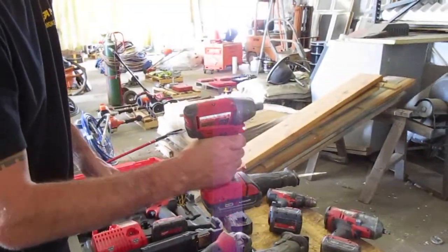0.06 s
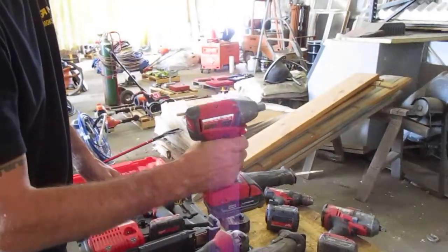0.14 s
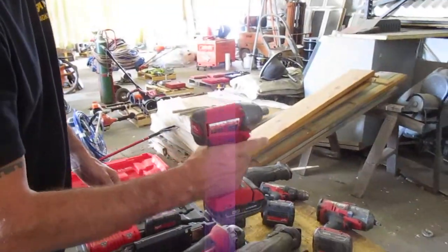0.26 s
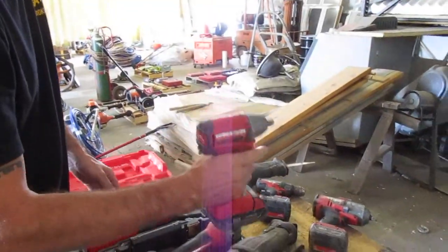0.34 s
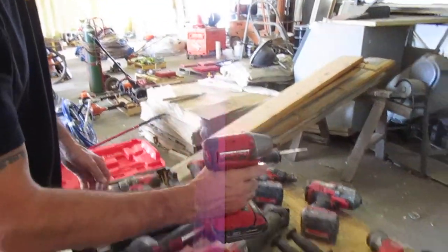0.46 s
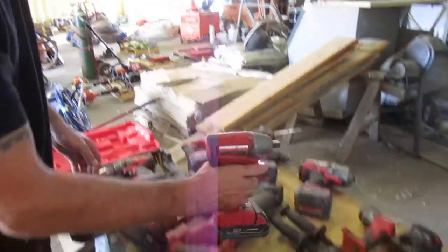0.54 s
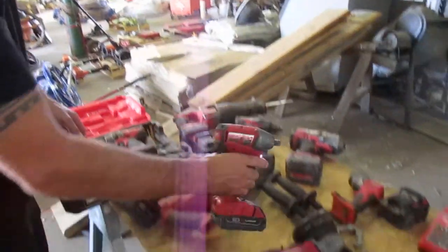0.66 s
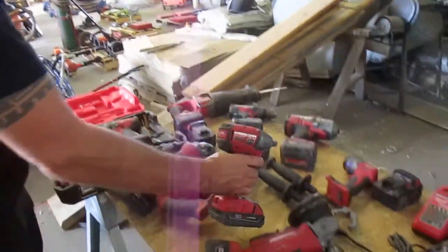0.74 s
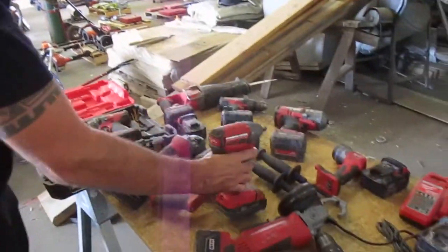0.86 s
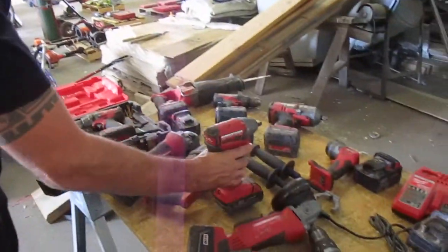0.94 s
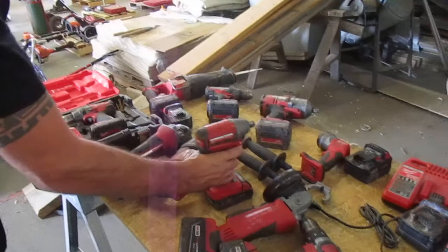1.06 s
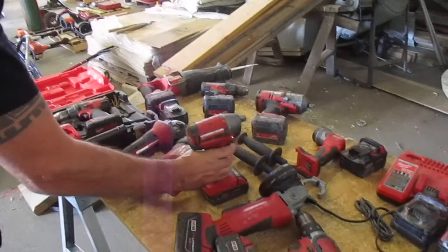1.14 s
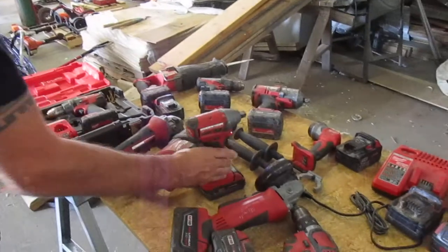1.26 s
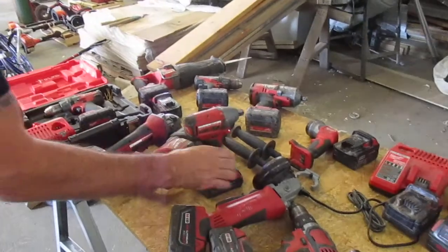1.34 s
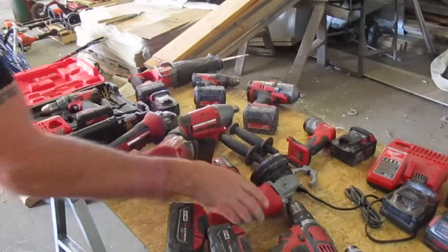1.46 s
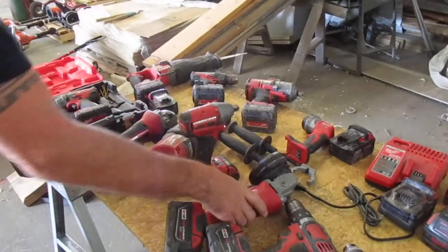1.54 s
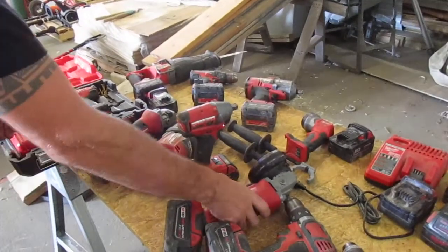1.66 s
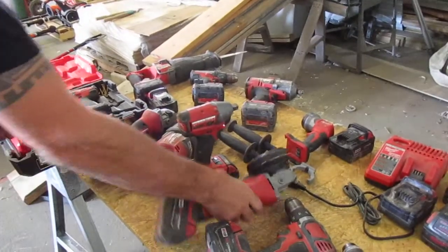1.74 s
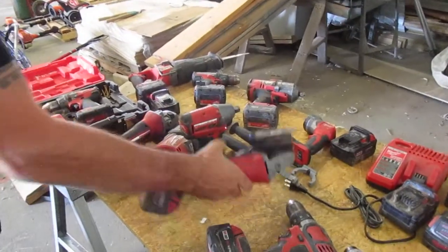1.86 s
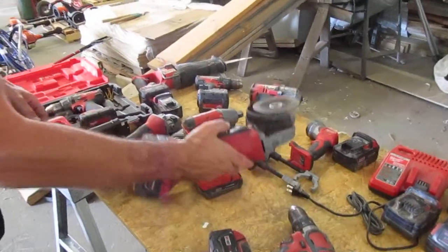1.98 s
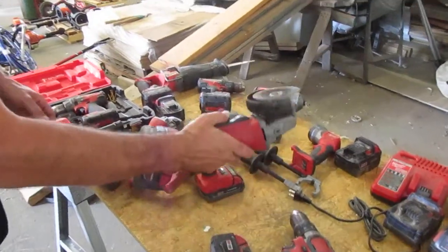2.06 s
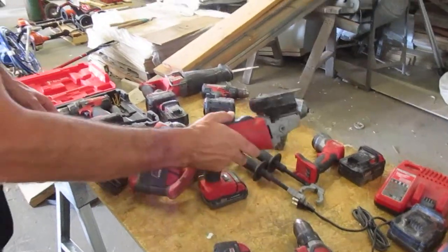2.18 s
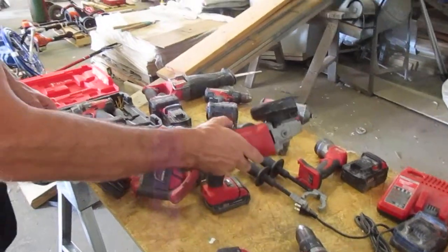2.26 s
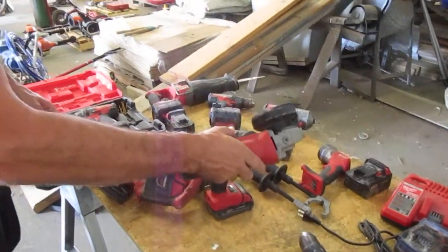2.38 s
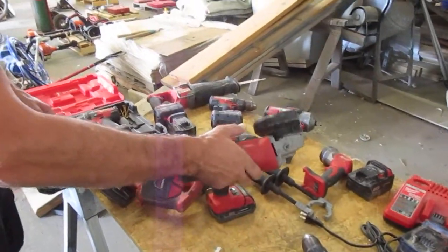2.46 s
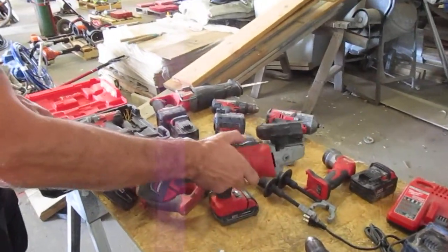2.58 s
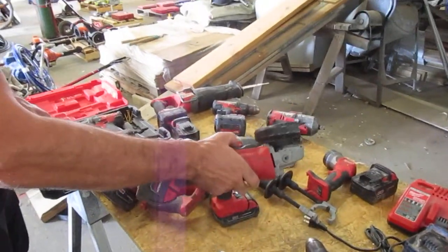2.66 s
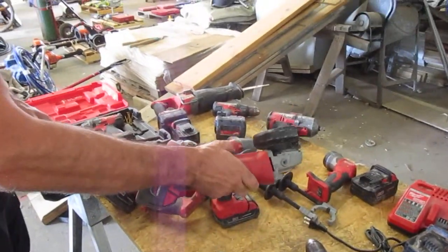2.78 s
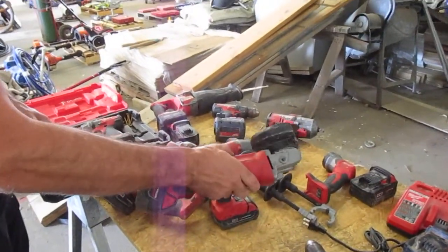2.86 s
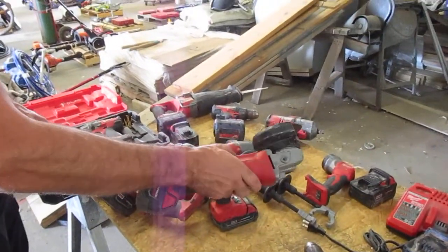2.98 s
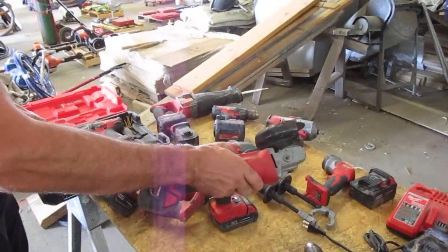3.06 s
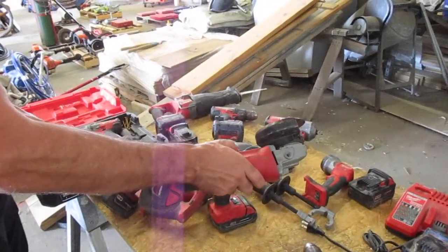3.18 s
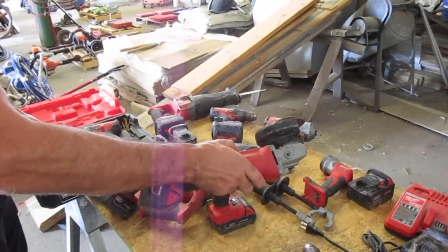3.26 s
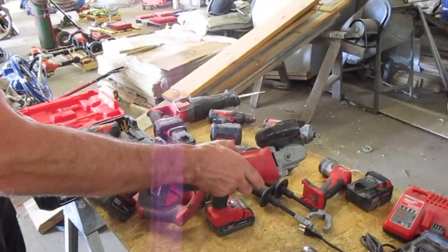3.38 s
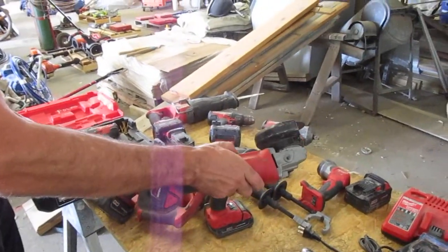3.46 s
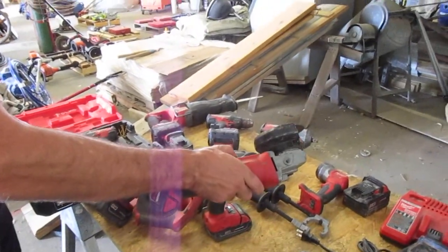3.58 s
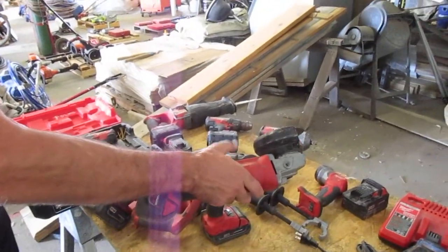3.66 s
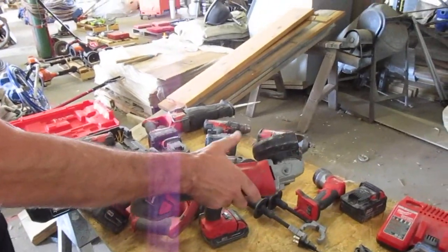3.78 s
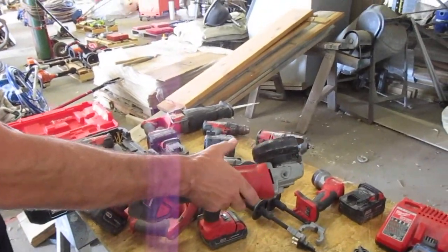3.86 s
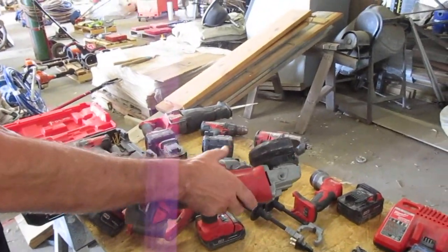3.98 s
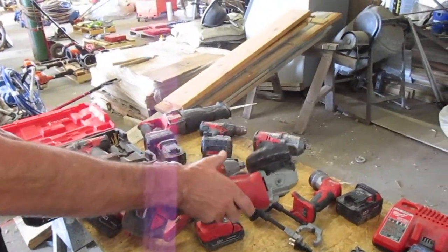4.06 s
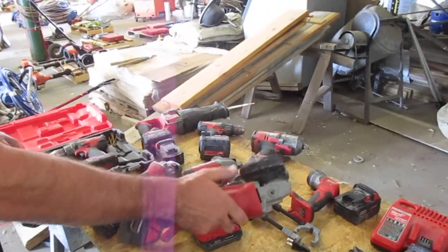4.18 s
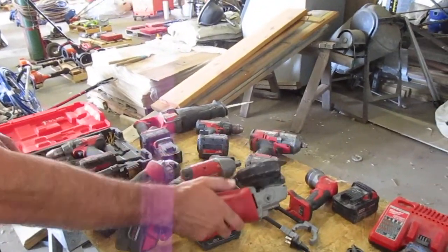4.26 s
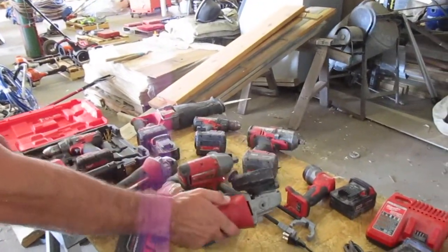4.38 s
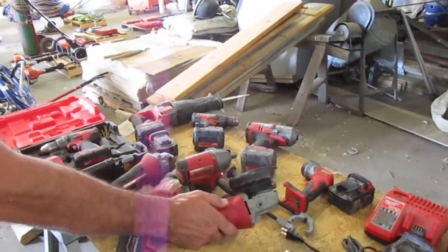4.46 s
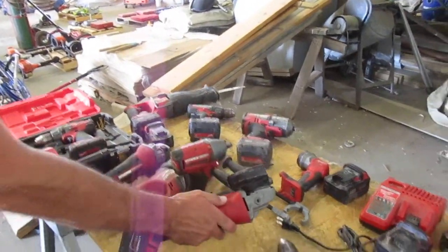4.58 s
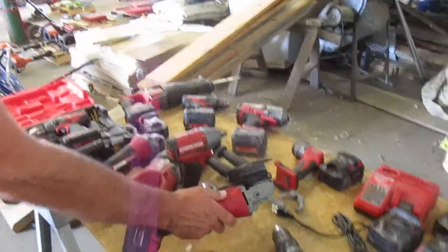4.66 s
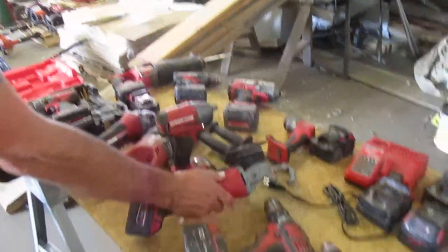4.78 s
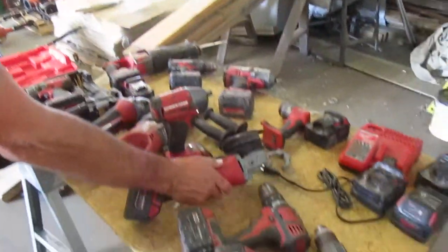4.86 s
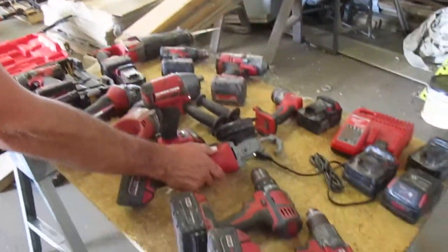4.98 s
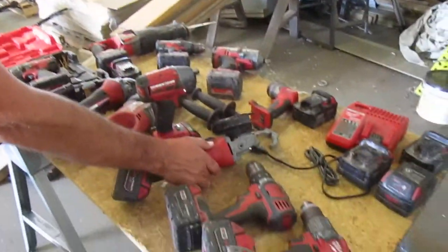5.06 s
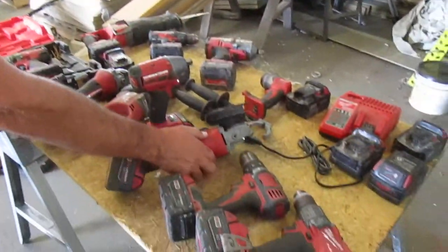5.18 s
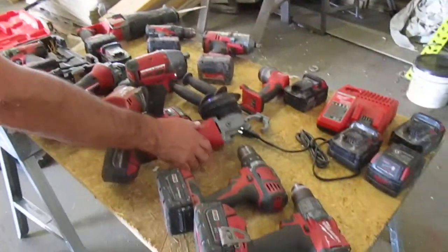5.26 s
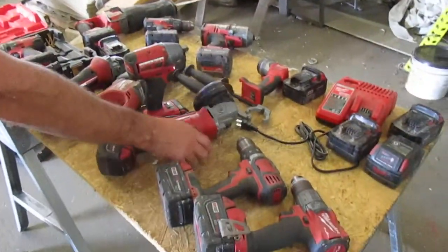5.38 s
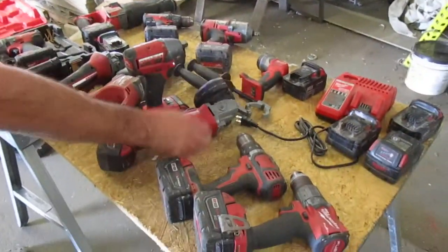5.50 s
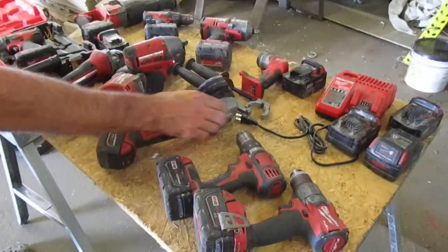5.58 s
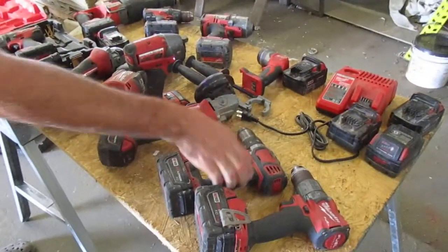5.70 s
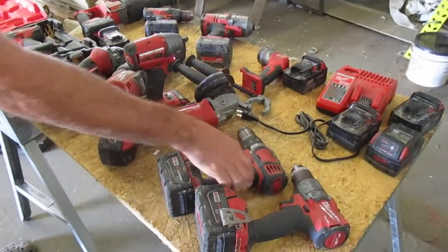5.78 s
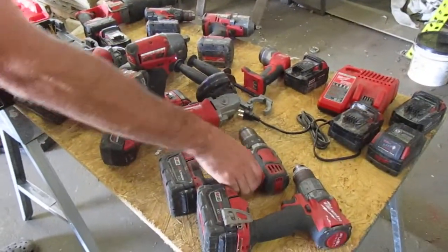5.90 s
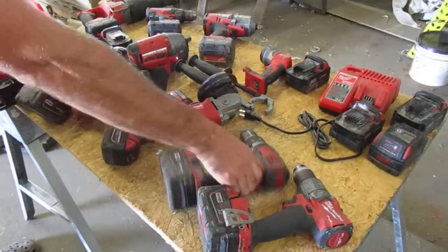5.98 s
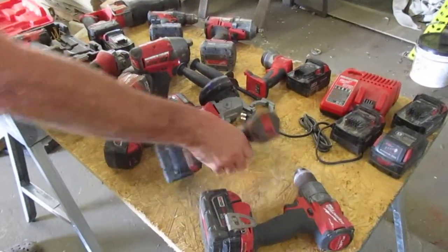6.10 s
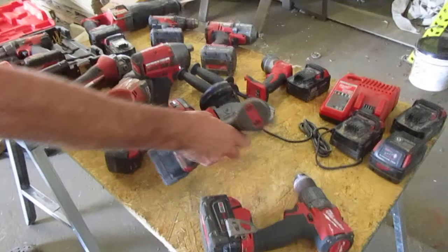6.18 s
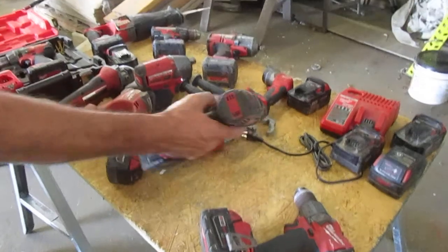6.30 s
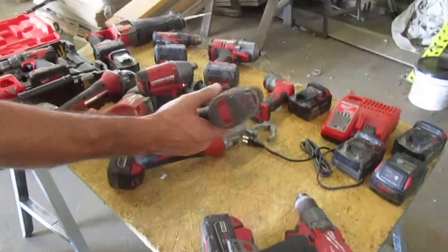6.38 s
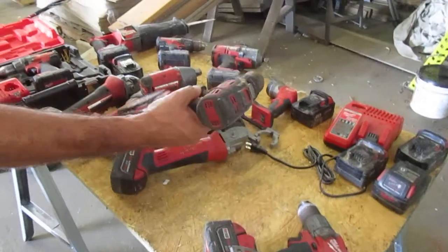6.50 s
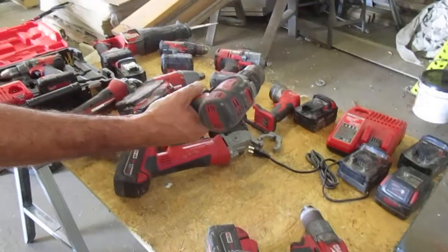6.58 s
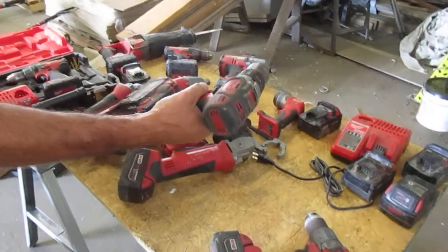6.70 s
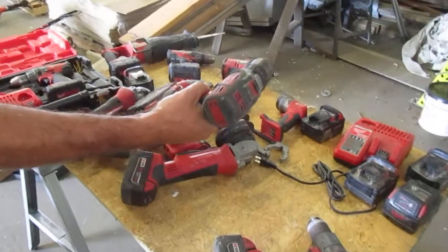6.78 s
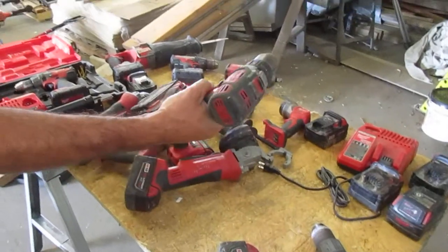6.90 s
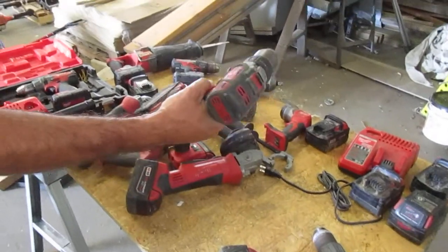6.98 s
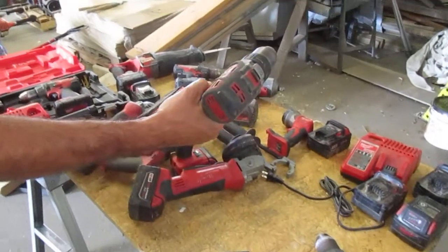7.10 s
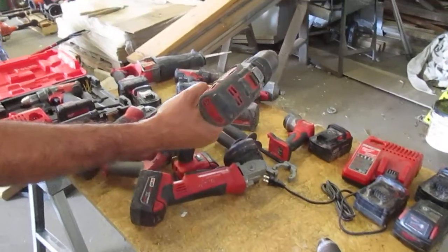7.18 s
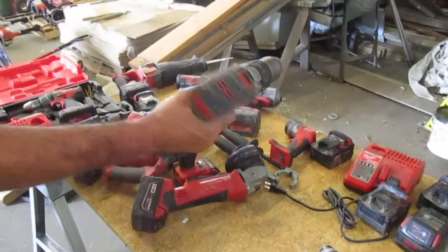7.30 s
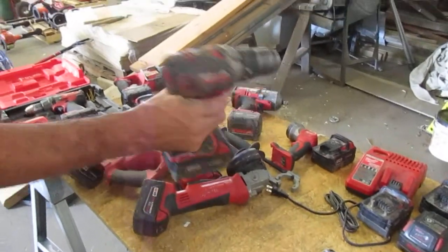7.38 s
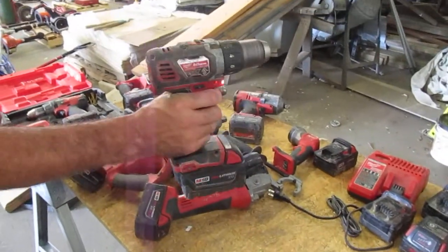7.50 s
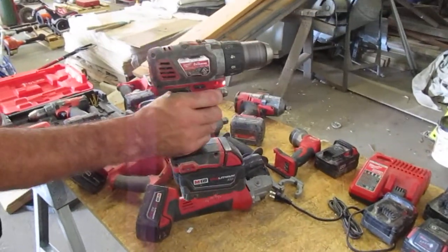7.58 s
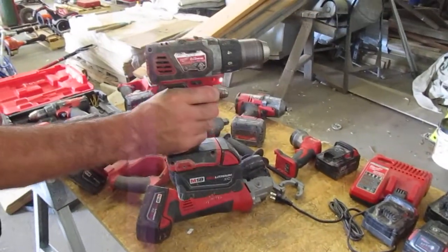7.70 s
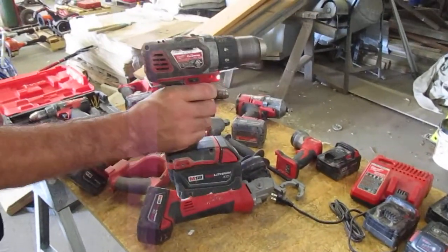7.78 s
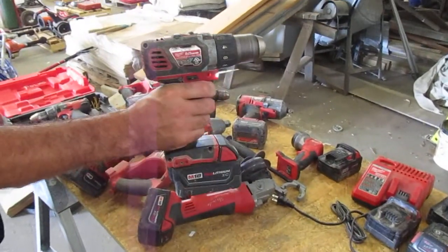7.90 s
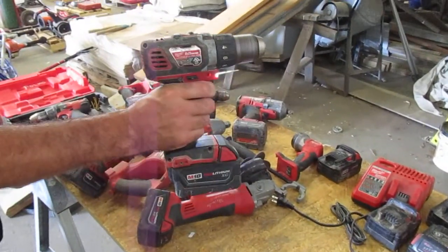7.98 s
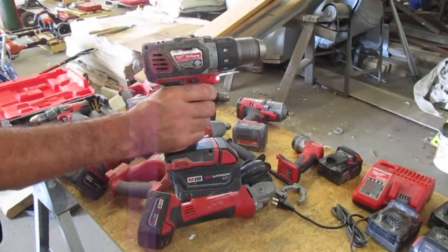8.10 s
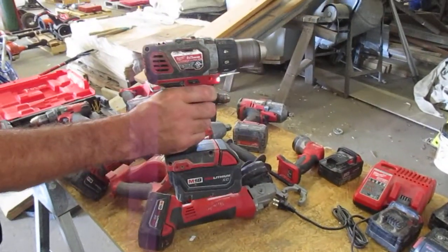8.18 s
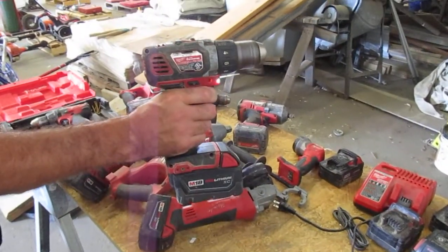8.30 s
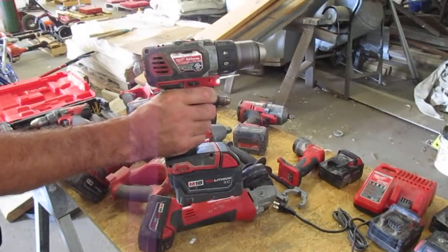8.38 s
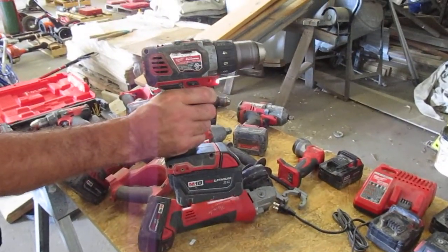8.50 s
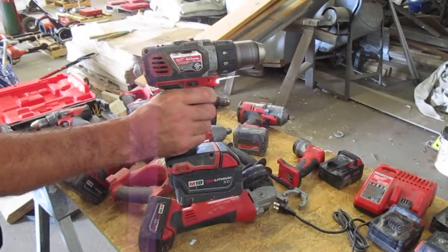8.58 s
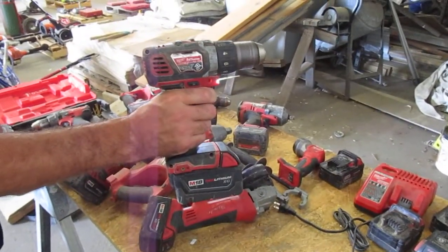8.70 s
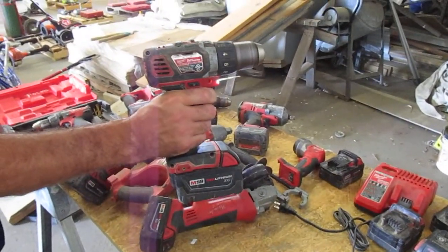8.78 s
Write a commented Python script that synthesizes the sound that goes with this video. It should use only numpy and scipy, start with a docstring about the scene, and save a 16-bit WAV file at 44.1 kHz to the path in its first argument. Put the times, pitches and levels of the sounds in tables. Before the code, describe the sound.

Close in a large, lightly echoing workshop, an impact driver's whine drops quickly to a stop. It lands with a hard thump on plywood, and small plastic clicks follow. A sharp switch snap starts an angle grinder, screaming briefly, then coasting down with rattling gear knocks. It is set down with a thud, lighter bumps follow, and a drill runs up and holds a bright whine. Faint low rumble stays behind; centred single microphone.

```python
"""First an impact driver brakes to a stop on a plywood bench in a large workshop; thumps and clicks follow.
An angle grinder runs up, then coasts with its gears rattling, and last a drill runs up to full speed.
Motors are tones on a speed curve over shaped noise; blows ring the board, plastic or casing as decaying sines.
Behind are a low rumble, hiss and far engine swells, with a hall tail on tools and blows.
One microphone feeds both channels, and its converter clips at full scale."""
import sys
import numpy as np
from scipy import signal
from scipy.fft import rfft, irfft
from scipy.io import wavfile
from scipy.ndimage import uniform_filter1d, map_coordinates

SR = 44100
rng = np.random.default_rng(int(sys.argv[2]) if len(sys.argv) > 2 else 0)


def to_wav(s):
    """Save 16-bit WAV."""
    ch = np.atleast_2d(s).T  # columns
    pcm = np.round(np.clip(ch, -1, 1) * 32767)  # PCM
    wavfile.write(sys.argv[1], SR, pcm.astype(np.int16))


N = 390285  # samples


def amp(db):
    """Decibels to gain."""
    return 10 ** (np.asarray(db) / 20)


def evened(x):
    """Scales to rms 1."""
    return x / np.sqrt(np.mean(x ** 2) + 1e-20)


def add(mix, start_s, sound):
    """Mixes a sound in at start_s seconds."""
    part = mix[round(start_s * SR):][:len(sound)]
    part += sound[:len(part)]


def coloured(x, points):
    """Filters x by a (Hz, dB) curve, -90 dB beyond its ends, and scales to rms 1."""
    hz, db = np.transpose(points)
    f = np.fft.rfftfreq(len(x), 1 / SR)
    gain = amp(np.interp(np.log(f + 1), np.log(hz), db, -90, -90))
    return evened(irfft(rfft(x) * gain, len(x)))


def resonate(x, hz, width):
    """A resonance of gain 1, width in Hz, that follows the curve hz."""
    turn = np.exp(2j * np.pi * np.cumsum(hz * np.ones(len(x))) / SR)
    r = np.exp(-np.pi * width / SR)
    return 2 * (turn * signal.lfilter([1 - r], [1, -r], x / turn)).real


def wander(size, per_s):
    """Slow chance: a smooth curve through per_s random knots a second."""
    knots = rng.standard_normal(int(size / SR * per_s) + 3)
    return map_coordinates(knots, [np.arange(size) / SR * per_s], order=2)


def tone(hz, waver_db):
    """A sine on a pitch curve, rms 1 before its level wavers."""
    turns = np.cumsum(hz) / SR + rng.random()
    return np.sqrt(2) * np.sin(2 * np.pi * turns) * amp(waver_db * wander(len(hz), 24.69))


def burst(t60, points):
    """A short puff of coloured noise that falls 60 dB in t60 seconds, peak 1."""
    t = np.arange(4096) / SR
    x = coloured(rng.standard_normal(4096), points) * amp(-60 * t / t60) * np.minimum(t / 0.00046, 1)
    return x / abs(x).max()


# full speed of the gear mesh; switch-on, half speed and time constant of the S-curve run-up
MESH_HZ, GRIND_ON_S, HALF_SPEED_S, RUN_UP_S = 2140, 2.852, 2.921, .055
# switch-off and end of the grinder; rubbing and air drag that slow the coasting wheel
GRIND_OFF_S, LAID_DOWN_S, RUB_HZ_PER_S, DRAG_PER_S = 3.677, 5.335, 765, .437


def mesh_hz(t):
    """Gear mesh rate: an S-curve run-up, then coasting against constant rubbing and proportional drag."""
    rest = RUB_HZ_PER_S / DRAG_PER_S
    coasting = (MESH_HZ + rest) * np.exp(-DRAG_PER_S * (t - GRIND_OFF_S)) - rest
    return np.minimum(MESH_HZ / (1 + np.exp((HALF_SPEED_S - t) / RUN_UP_S)), coasting)


# Loudest gear knocks while the grinder coasts. Each row: start in seconds, level in dB before the ring and
# burst gains, casing ring in Hz.
GEAR_KNOCKS = [(3.7617, -5.5, 1960), (3.7961, -4, 1900), (3.842, -14, 2670), (3.8624, 0, 1890),
               (3.8944, -8.5, 2710), (3.9147, -15, 3000), (3.954, -9, 3200), (3.993, -13, 2750),
               (4.0899, -6, 3030), (4.136, -12, 2780), (4.1558, -6, 2190), (4.2068, -4.5, 2700),
               (4.2272, -11, 2570), (4.3206, -3, 2280), (4.338, -4, 2260), (4.3858, -1, 2270),
               (4.4026, 1, 2270), (4.4795, -4, 2190), (4.5173, -2.5, 1950), (4.551, -0.5, 1890),
               (4.571, 0, 1900), (4.5929, 0.5, 1860), (4.6307, -2, 1900), (4.6659, -4, 2060),
               (4.71, -21, 2820), (4.7749, -6.5, 4460), (4.8465, -17, 4400), (4.9819, -14, 4500),
               (5.1203, -5, 4600), (5.185, -39, 4600), (5.2066, -13, 4220)]


def gear_knocks():
    """Each loud knock rings the casing as a very short sine with a burst of noise."""
    out, t = np.zeros(N), np.arange(4096) / SR
    for start_s, db, hz in GEAR_KNOCKS:
        ring = np.sin(2 * np.pi * hz * t) * t / 0.0023 * np.exp(1 - t / 0.0013)
        crack = burst(0.019, [(1200, -34.0), (2500, 23.5), (7000, 8.0), (12000, -21)])
        add(out, start_s, amp(db) * (0.56 * ring + 0.16 * crack))
    return out


def rattle(start_s, per_s):
    """Backlash knocks: nearly even steps, with the loud knocks falling on the beat."""
    size = len(per_s)
    turns = np.cumsum(per_s * (1 + .08 * wander(size, 30))) / SR
    at = np.round((np.transpose(GEAR_KNOCKS)[0] - start_s) * SR).astype(int)
    # bend the count so that each loud knock lands on a whole step
    steps = np.cumsum(np.maximum(np.round(np.diff(turns[at], prepend=0)), 1))
    turns = turns + np.interp(np.arange(size), at, steps - turns[at])
    hits = (np.diff(np.floor(turns), prepend=0) > 0) * amp(1.5 * rng.standard_normal(size))
    hits = hits + .5 * (rng.random(size) < 15 / SR)  # stray rebounds
    hits[at] += .6
    u = np.arange(700) / SR
    knock = (1 - np.exp(-u / .001)) * np.exp(-u / .0025)
    return evened(signal.oaconvolve(hits, knock)[:size])


# Noise of the grinder at the microphone. Each row: time in seconds, level in dB.
GRINDER_LEVEL = [(2.852, -18.5), (3.0, -17), (3.11, -21.5), (3.31, -17), (3.65, -18.5), (3.73, -19),
                 (4.15, -20.5), (4.42, -21), (4.77, -22.5), (5.05, -23.5), (5.335, -35.5)]
# Noise colour under power, coasting and nearly stopped. Each row: frequency in Hz, relative density in dB.
GRINDER_RUN = [(150, -45), (250, -22), (312, -59.5), (384, -18.5), (750, -9.5), (954, -13), (1800, -1.5),
               (2030, 2), (2210, 1.5), (3900, 0), (4390, -1.5), (5310, -8), (8150, -4.5), (15100, -24)]
GRINDER_COAST = [(150, -62), (250, -30), (906, -18), (1260, -7.5), (1650, -9.5), (1960, -0.5), (2450, -8.5),
                 (2720, 1), (3760, -10), (9350, -14.5), (13900, -31.5), (15100, -43)]
GRINDER_SLOW = [(530, -1), (900, -4), (1600, -2), (1890, -8.5), (2130, -3), (3300, -3.5), (3620, -11.5),
                (4640, -6), (5290, -10), (6940, -14), (9430, -48.5), (15100, -79)]
# Gear mesh tones before the casing. Each row: multiple of the mesh rate, dB under power, dB coasting.
MESH_TONES = [(1, -2, 0), (2, 6, -6), (3, -7, -3), (4, -14, -13)]
# How the casing passes a mesh tone. Each row: frequency in Hz, gain in dB.
CASING_PASS = [(130, -40), (240, -30), (330, -21), (430, -25.5), (530, -33), (760, -28.5), (950, -33.5),
               (1080, -39.5), (1240, -25), (1520, -36), (1700, -28.5), (2140, -35.5), (3000, -36),
               (4280, -35.5), (6400, -37.5), (9000, -42.5)]
# Rings of the wheel guard. Each row: frequency in Hz, width in Hz, dB before the noise is levelled.
GUARD_RINGS = [(4700, 120, -20.5), (6430, 200, -32.5), (7500, 120, -17.5), (8150, 400, -22.5),
               (9210, 300, -20)]
RATTLE_PER_S = (57, 108)  # mean knock rate (coasting, powered)
RATTLE_SHARE = (0.59, 0.79, 0.6)  # share 0-1 before strain lowers it (coasting, powered, nearly stopped)
RING_HZ, RING_SLOW_HZ = 2420, 4570  # casing under power and nearly stopped; coasting, it follows the knocks


def grinder():
    """Mesh tones pass the casing; knocks gate noise that rings casing and guard, coloured by speed."""
    t = np.arange(GRIND_ON_S, LAID_DOWN_S, 1 / SR)
    size, since_on, hz = len(t), t - GRIND_ON_S, mesh_hz(t)
    noise_db = np.interp(t, *np.transpose(GRINDER_LEVEL))
    ring_rows = [(GRIND_OFF_S, 0, RING_HZ)] + GEAR_KNOCKS
    ring_hz = np.interp(t, *np.transpose(ring_rows)[::2])
    ring_hz = uniform_filter1d(ring_hz, size=2500).clip(max=2900)

    ahead = np.maximum.accumulate(hz[::-1])[::-1]  # highest speed still to come
    power, slow = np.clip((ahead - 1850) / 250, 0, 1), np.clip((800 - ahead) / 300, 0, 1)
    # load on the teeth while the wheel gathers speed: upper tones weaken, less backlash
    strain = 1 - hz / ahead
    per_s = np.interp(power, [0, 1], RATTLE_PER_S)
    share = np.clip(np.interp(power + 2 * slow, [0, 1, 2], RATTLE_SHARE), 0, .98)
    share = share * np.clip(1 - 4 * strain, .3, 1)

    f, pass_db = np.transpose(CASING_PASS)
    mesh = 0
    for k, power_db, coast_db in MESH_TONES:
        db = coast_db + power * (power_db - coast_db) - (k - 1) * 30 * strain - (k > 2) * 7 * slow
        db = db + np.interp(np.log(k * hz), np.log(f), pass_db)
        mesh = mesh + amp(db) * tone(k * hz, 3 - power)
    mesh = mesh * np.clip((hz - 170) / 170, 0, 1) ** 2  # the teeth hardly load as the wheel stops

    gate = np.sqrt(1 - share) + np.sqrt(share) * rattle(GRIND_ON_S, per_s)
    drive = gate * rng.standard_normal(size)
    body = power * coloured(drive, GRINDER_RUN) + slow * coloured(drive, GRINDER_SLOW)
    body = body + (1 - power - slow) * coloured(drive, GRINDER_COAST)
    ring = evened(resonate(resonate(drive, ring_hz, 600), ring_hz, 900))
    slow_ring = evened(resonate(drive, RING_SLOW_HZ, 260))
    casing = .55 * (1 - slow) * (1 - .6 * power) * ring + .6 * slow * slow_ring
    guard = sum(amp(db) * evened(resonate(drive, f, w)) for f, w, db in GUARD_RINGS)
    # smeared bands that follow the mesh rate
    fuzz = evened(resonate(resonate(drive, 2.1 * hz, 450), 2.1 * hz, 600))
    fuzz = fuzz + .5 * evened(resonate(drive, 3.75 * hz, 800))
    noise = evened(body + casing + guard + (0.14 * power + 1.9 * np.minimum(strain, .3)) * fuzz)
    # buzz of the motor as current first flows
    stall = 0.054 * np.sin(2 * np.pi * 505 * since_on) * np.exp(-(since_on / 0.069) ** 2)
    return GRIND_ON_S, amp(noise_db) * noise + mesh + stall


# Overall curve of the drill. Each row: time in seconds, level in dB.
DRILL_LEVEL = [(6.73, -45.5), (6.79, -22.5), (6.99, -18.5), (7.39, -16.5), (7.48, -18.5), (8.13, -16.5),
               (8.64, -16), (8.72, -18.5), (8.85, -16.5)]
# Shaft and gear tones before the whine gain. Each row: multiple of the shaft, dB pointed away, dB side-on.
DRILL_ORDERS = [(1, -50, -49), (2, -46, -40), (4, -50, -40), (6, -47, -41), (7, -48, -40), (8, -35, -39),
                (8.25, -46, -38), (10, -38, -35), (11.7, -36, -48), (12.455, -31, -39), (15, -34, -29),
                (16.65, -27, -46), (18, -42, -40), (20, -35, -36), (20.37, -36, -35), (24.9, -40, -44),
                (30, -33, -35), (35.04, -46, -43), (40, -35, -50), (50.05, -44, -43)]
# Noise colour pointed away and side-on. Each row: frequency in Hz, relative density in dB.
DRILL_AWAY = [(150, -32), (250, -42.5), (418, -33), (560, -14), (890, -7), (1830, -2.5), (2330, 6.5),
              (2670, 3.5), (3510, -6), (3900, 4.5), (5680, 2.5), (6190, 0), (13200, -8.5), (15100, -9)]
DRILL_SIDE = [(150, -39), (250, -28), (297, -40), (352, -20), (532, -9), (590, -6), (750, -6), (1170, 2.5),
              (1390, -4), (2370, 7), (3510, 2.5), (6090, 4.5), (8010, -0.5), (15100, -5.5)]
# Speed still missing at the start, motor then chuck. Each row: shaft speed in Hz, time constant in seconds.
DRILL_LAGS = [(196, .075), (43, .296)]
DRILL_HZ, DRILL_ON_S = 298.7, 6.73  # full shaft speed, switch-on
TURN_S, TURN_LENGTH_S = 7.434, .2  # middle and approximate length of the turn to side-on


def drill():
    """Shaft and gear orders over fan noise; both change colour as the tool is turned side-on."""
    t = np.arange(DRILL_ON_S, N / SR, 1 / SR)
    hz = DRILL_HZ - sum(lag * np.exp((DRILL_ON_S - t) / tau) for lag, tau in DRILL_LAGS)
    side = .5 + .5 * np.tanh(2 * (t - TURN_S) / TURN_LENGTH_S)
    noise_db = np.interp(t, *np.transpose(DRILL_LEVEL))
    strain = 1 - hz / hz.max()  # teeth loaded while the chuck gathers speed
    white = rng.standard_normal(len(hz))
    brushes = white * (1 + 0.18 * np.cos(4 * np.pi * np.cumsum(hz) / SR))  # sparks twice a turn
    air = (1 - side) * coloured(brushes, DRILL_AWAY) + side * coloured(brushes, DRILL_SIDE)

    whine = 0
    for k, away_db, side_db in DRILL_ORDERS:
        f = k * hz
        # low tones are weaker pointed away and emerge late
        muffled_db = -5 * np.clip(1 - f / 2300, 0, 1) * (1 - side) - 40 * strain * (f < 20 * hz)
        db = away_db + side * (side_db - away_db) + muffled_db
        whine = whine + amp(db) * tone(f, 1.5 + 2.4 * (1 - side))

    gears = evened(resonate(white, 20.3 * hz, 320))
    gears = gears + 2.0 * strain * evened(resonate(white, 16.65 * hz, 200))
    shell = evened(resonate(white, 3490, 120)) * (1 - side)
    noise = evened(air + (0.27 + 1.36 * strain) * gears + 0.34 * shell)
    noise = noise * amp(.5 * wander(len(hz), 30.35))
    fade_in = np.minimum(np.arange(len(hz)) / 300, 1)
    return DRILL_ON_S, amp(noise_db) * (noise + amp(19.5) * whine) * fade_in


# Shaft tones before the whine gain. Each row: multiple of the shaft, dB running, dB braking.
DRIVER_ORDERS = [(1, -18, -16), (2, -8, -12), (3, -12, -16), (4, -2, -5), (6, -16, -28), (8, -20, -4),
                 (13, -3, -8), (16, -24, -17), (26, -14, -16)]
# Fan and gear noise. Each row: frequency in Hz, relative density in dB.
DRIVER_AIR = [(180, -56), (300, -20), (437, -19.5), (681, -1.5), (946, -7), (1360, 0.5), (1730, -1.5),
              (3940, -5), (4570, -7.5), (7110, -15), (8950, -9), (10500, -25), (15100, -28)]
# Shell resonances that lift tones sweeping through. Each row: frequency in Hz, width in Hz, lift in dB.
DRIVER_SHELL = [(760, 110, 11), (2150, 200, 9)]
# shaft speed, braking from .. to, power law of the slowing
DRIVER_HZ, BRAKE_S, STOP_S, BRAKE_CURVE = 350, .195, .432, 2
DRIVER_NOISE_DB, DRIVER_WHINE_DB, BRAKE_SAG_DB = -17, -25.5, -2.5
DYING_S, DYING_DB_PER_S = 0.38, -500


def driver():
    """Shaft orders over fan and gear noise; the gears chatter more as the brake slows them."""
    t = np.arange(0, STOP_S, 1 / SR)
    braking = np.clip((t - BRAKE_S) / (STOP_S - BRAKE_S), 0, 1)
    hz = DRIVER_HZ * (1 - braking ** BRAKE_CURVE)
    brake = np.clip(4 * (1 - hz / hz.max()), 0, 1)
    whine = 0
    for k, run_db, brake_db in DRIVER_ORDERS:
        lift_db = sum(db * np.exp(-((k * hz - centre) / width) ** 2) for centre, width, db in DRIVER_SHELL)
        whine = whine + amp(run_db + brake * (brake_db - run_db + lift_db)) * tone(k * hz, 1.7)
    chatter = amp(3.3 * brake * wander(len(hz), 87.1))
    air = evened(coloured(rng.standard_normal(len(hz)), DRIVER_AIR) * chatter)
    fade = amp(BRAKE_SAG_DB * brake + DYING_DB_PER_S * np.maximum(t - DYING_S, 0))
    fade = fade * np.minimum(t[::-1] / .014, 1)
    return 0, (amp(DRIVER_NOISE_DB) * air + amp(DRIVER_WHINE_DB) * whine) * fade


# Tools landing on the board. Each row: start in seconds, and peaks in dB of board ring, wooden slap and crack.
THUMPS = [(1.048, 0.5, -13.5, -17.5), (1.103, -32, -26, -48), (1.708, -23.5, -30, -40),
          (4.844, -14.5, -29, -35), (4.954, -15, -32, -32), (5.3354, -3.5, -10, -5), (5.416, -23, -41, -46),
          (5.505, -18, -51, -46), (5.6247, -19.5, -32.5, -58), (5.724, -36, -50, -51),
          (5.813, -34, -52, -51), (5.885, -38, -51, -47), (5.961, -44, -57, -50), (6.0182, -6, -0.5, -15.5)]
# Modes of the plywood board. Each row: frequency in Hz, relative dB before random scatter, t60 in seconds.
BOARD_MODES = [(95, -40, 0.74), (133, -14.5, 0.18), (186, -11.5, 0.057), (198.4, -4, 0.097),
               (235, 1, 0.063), (331, 1, 0.038), (443, -5.5, 0.041), (576, -13, 0.066), (634, -8.5, 0.046),
               (815, -29, 0.2), (1033, -34, 0.071)]


def thumps():
    """A blow rings the board's modes and adds noise bursts for the slap and the crack."""
    out, t = np.zeros(N), np.arange(SR // 2) / SR
    no_bass = signal.butter(4, 105, "high", fs=SR, output="sos")  # the blows carry no deep bass
    for start_s, db, slap_db, crack_db in THUMPS:
        ring = 0
        for hz, mode_db, t60 in BOARD_MODES:
            decay = amp(mode_db + 2.7 * rng.standard_normal() - 60 * t / t60)
            ring = ring + decay * np.sin(2 * np.pi * hz * t)
        ring = ring * (1 - np.exp(-t / (0.00065 * amp(-.6 * db))))  # gentle blows push more slowly
        ring = signal.sosfilt(no_bass, ring)
        slap = burst(0.029, [(400, 3), (700, 2.5), (1100, 3.0), (1500, -6), (2100, -5.5), (3500, -41)])
        crack = burst(0.034, [(900, -19), (2500, 14.5), (5000, 2.5), (9000, -7), (15000, -19)])
        add(out, start_s, -amp(db) * ring / abs(ring).max())
        add(out, start_s, amp(slap_db) * slap)
        add(out, start_s, amp(crack_db) * crack)
    return out


# Switches, latches and plastic on plastic. Each row: start in seconds, level in dB, and relative to that level
# the hollow part below 1.3 kHz in dB and the bright snap in dB.
CLICKS = [(0.8395, -32, -4, -6), (0.9947, -39.5, 1.5, -4.5), (1.0909, -31, 6.5, -11.5),
          (1.394, -47, -17.5, 9.5), (1.5574, -42, -3.5, -1.5), (1.7075, -24, -7, -13), (1.721, -25, 3, -16),
          (1.7614, -30, -3.5, -16.5), (1.7704, -38, 7, -15.5), (1.8835, -22.5, -21, -22),
          (1.8933, -18.5, -11, -22), (1.9435, -32, -1, -20), (2.0372, -26, -18, -32),
          (2.2516, -22.5, -3.5, -19.5), (2.428, -18, -17, -23), (2.4505, -38.5, 6, -32),
          (2.61, -31.5, -5, -14), (2.6235, -25, -3.5, -8.5), (2.7865, -33, -6.5, -19.5),
          (2.8015, -19, -7.5, -18.5), (2.829, 0.5, -23, -16.5), (2.8523, -3, -23, -1.5),
          (3.6546, -7.5, -8, -12), (5.456, -44.5, -14.5, 10), (5.6344, -34, -4, -16.5),
          (6.0794, -52, 3, -.5), (6.2614, -48.5, -2.5, -2), (6.655, -34, -21.5, -6), (6.722, -21, -8.5, -5)]
# Modes of the plastic parts. Each row: frequency in Hz, t60 in seconds.
PLASTIC_MODES = [(760, 0.034), (1200, .03), (1700, 0.013), (2200, 0.018), (2600, 0.012), (3000, 0.0074),
                 (3900, 0.017)]
# Level of each plastic mode in dB, before the hollow setting and random scatter.
PLASTIC_MODES_DB = [-3.5, -7, -7, -7, 1.5, 2, -17.5]


def clicks():
    """A click rings short plastic modes and adds a bright snap of noise."""
    out, t = np.zeros(N), np.arange(4096) / SR
    for start_s, db, hollow_db, snap_db in CLICKS:
        modes_db = np.add(PLASTIC_MODES_DB, [hollow_db] * 2 + [0] * 5)
        gains = amp(modes_db + 1.7 * rng.standard_normal(len(PLASTIC_MODES)))
        ring = 0
        for gain, (hz, t60) in zip(gains, PLASTIC_MODES):
            ring = ring + gain * amp(-60 * t / t60) * np.sin(2 * np.pi * hz * t)
        ring = ring * np.minimum(t / 0.0013, 1) / 0.92
        snap = burst(.025, [(3500, 1.0), (6000, 1.5), (15000, -17)])
        add(out, start_s, amp(db) * (ring + amp(snap_db) * snap))
    return out


# Sparse early-to-late tail of the hall. Each row: frequency in Hz, t60 in seconds.
HALL_T60 = [(100, 0.93), (500, 0.59), (2000, 0.45), (5000, 0.48), (12000, 0.32)]


def hall(x):
    """Sparse taps of random sign, each band dying at its own speed."""
    taps = np.zeros(SR)
    at = np.arange(400, SR - 20, 20)
    taps[at + rng.integers(0, 20, len(at))] = rng.choice([-1., 1.], len(at))
    hz, t, z = signal.stft(taps, SR, nperseg=256)
    f, t60 = np.transpose(HALL_T60)
    band_t60 = np.interp(np.log(hz + 1), np.log(f), t60)[:, None]
    tail = signal.istft(z * amp(-60 * t / band_t60), SR, nperseg=256)[1]
    return signal.fftconvolve(x, tail / np.linalg.norm(tail))[:N]


# Background, swelling and sinking. Each row: time in seconds, level of the rumble in dB.
SHOP_LEVEL = [(0, -38.5), (1.1, -43), (2.7, -39), (3.1, -52), (3.499, -48.5), (4.7, -51), (5.2, -40.5),
              (5.77, -48.5), (6.6, -48.5), (8.85, -42)]
# Colour of the rumble and of the hiss. Each row: frequency in Hz, relative density in dB.
RUMBLE = [(12, -40.5), (20, -7), (43, -3), (76, -1), (115, 5), (161, -2.5), (193, -6.5), (226, -5),
          (325, -13), (450, -27.5), (580, -58), (990, -120)]
HISS = [(180, -30), (300, -3.5), (475, -8), (550, -4.5), (607, -9), (764, -6), (1010, -8.5), (1100, -9),
        (1760, -13.5), (3080, -15), (15100, -37.5)]
# Hums of far machines. Each row: frequency in Hz, width in Hz, dB over the rumble.
HUMS = [(49.7, 2.3, -6), (152.3, 1.8, -9)]
# Faint far whine. One row: frequency in Hz, width in Hz, dB over the hiss.
FAR_WHINE = (2050, 54, -15.5)
# Far engine swells. Each row: start in seconds, length in seconds, from Hz, to Hz, top rms in dB of the fundamental.
DRONE = [(.05, 1.42, 126, 119.3, -34), (1.0, 1.32, 101, 119.5, -37.5), (7.499, 2.36, 110, 113.1, -39.5)]
HISS_DB = -8.5  # mean, over the rumble
DRONE_OCTAVE_DB, DRONE_SWELL = -14.5, 1.2  # octave over the fundamental; power of the swell's sine arch


def shop():
    """Low rumble with two hums, a faint hiss and whine, and a far engine that comes and goes."""
    level = amp(np.interp(np.arange(N) / SR, *np.transpose(SHOP_LEVEL)))
    white = rng.standard_normal((3, N))
    hums = sum(amp(db) * evened(resonate(white[1], hz, width)) for hz, width, db in HUMS)
    rumble = coloured(white[0], RUMBLE) + hums
    whine_hz, whine_width, whine_db = FAR_WHINE
    whine = amp(whine_db) * evened(resonate(white[2], whine_hz, whine_width))
    hiss = amp(HISS_DB + 1.0 * wander(N, 13)) * (coloured(white[2], HISS) + whine)
    out = level * (rumble + hiss)
    for start_s, length_s, from_hz, to_hz, db in DRONE:
        u = np.arange(0, 1, 1 / (length_s * SR))
        phase = 2 * np.pi * np.cumsum(from_hz + (to_hz - from_hz) * u) / SR
        swell = np.sqrt(2) * amp(db) * np.sin(np.pi * u) ** DRONE_SWELL
        add(out, start_s, swell * (np.sin(phase) + amp(DRONE_OCTAVE_DB) * np.sin(2 * phase)))
    return out


# Level in dB sent to the hall: tools held close, then blows on the bench and gear knocks.
HALL_SEND_DB = [-19, -15]


def scene():
    """Tools and blows in the hall over the background, one microphone on both channels."""
    tools, blows = np.zeros(N), thumps() + clicks() + gear_knocks()
    for tool in (driver, grinder, drill):
        add(tools, *tool())
    mono = tools + blows + hall(amp(HALL_SEND_DB) @ [tools, blows]) + shop()
    return np.array([mono, mono])


EDGE_HZ = 15100  # upper band limit


def record(dry):
    """The microphone drops the deepest bass, the converter clips at full scale; then the band limit."""
    thin = signal.sosfilt(signal.butter(2, 18, "high", fs=SR, output="sos"), dry)
    taps = signal.firwin(1023, EDGE_HZ, window=("kaiser", 9), fs=SR)
    return np.clip(signal.oaconvolve(np.clip(thin, -1, 1), taps[None], "same"), -1, 1)


dry = scene()
out = record(dry)
to_wav(out)
```